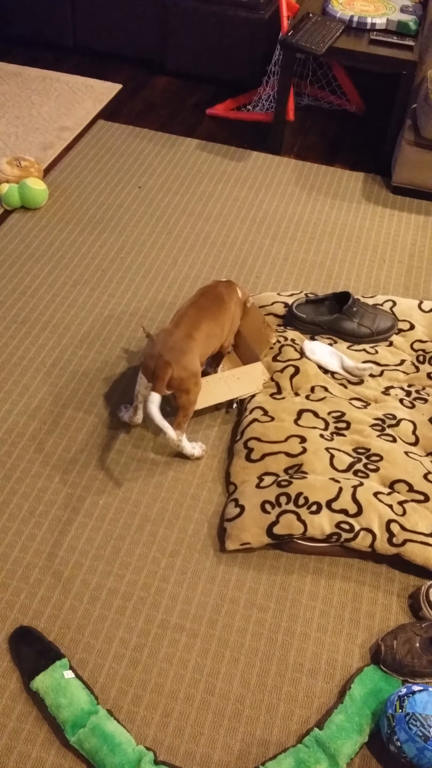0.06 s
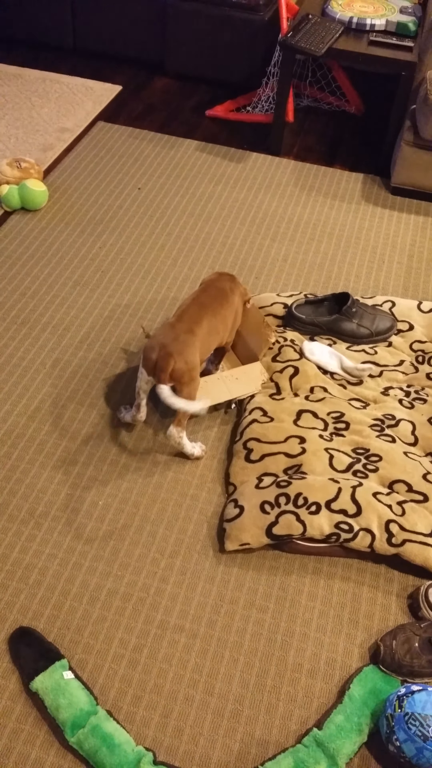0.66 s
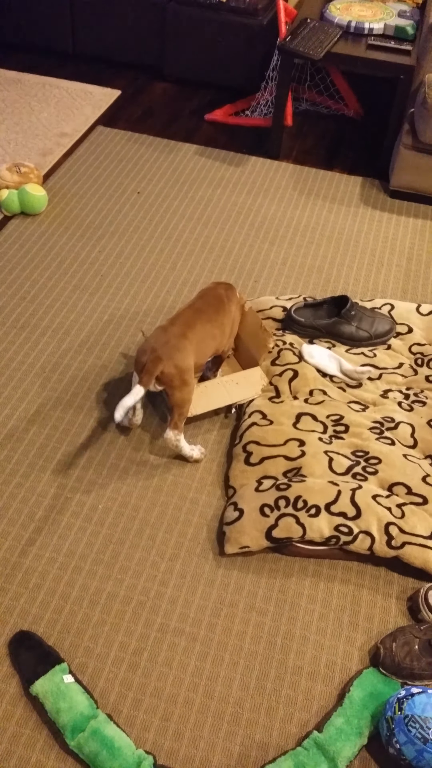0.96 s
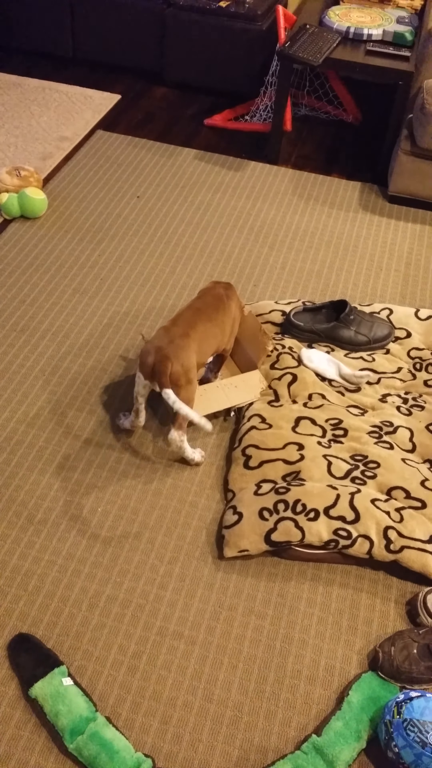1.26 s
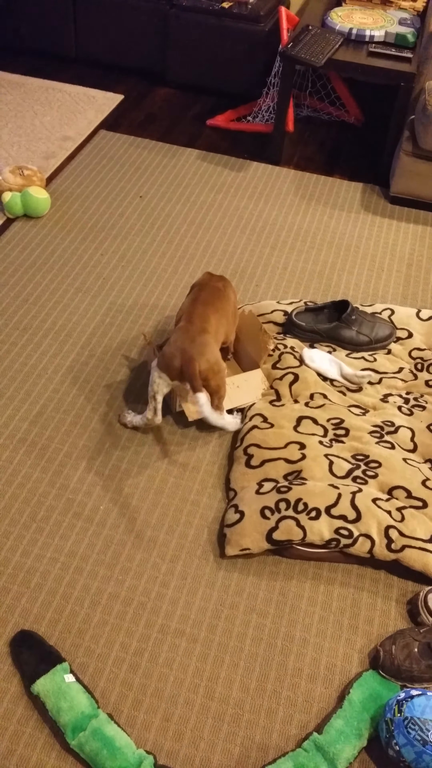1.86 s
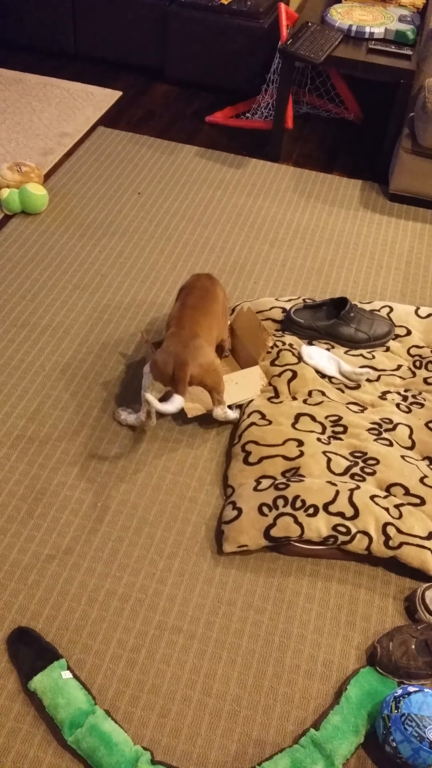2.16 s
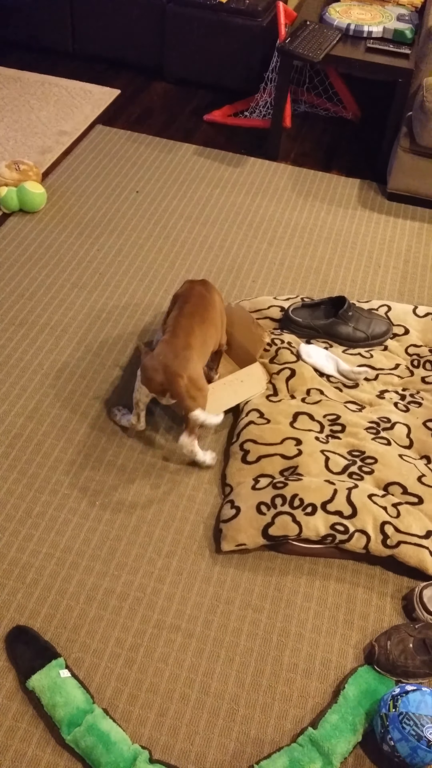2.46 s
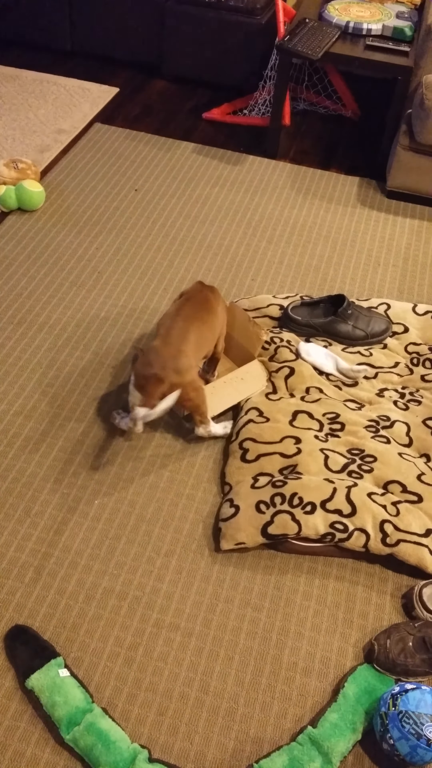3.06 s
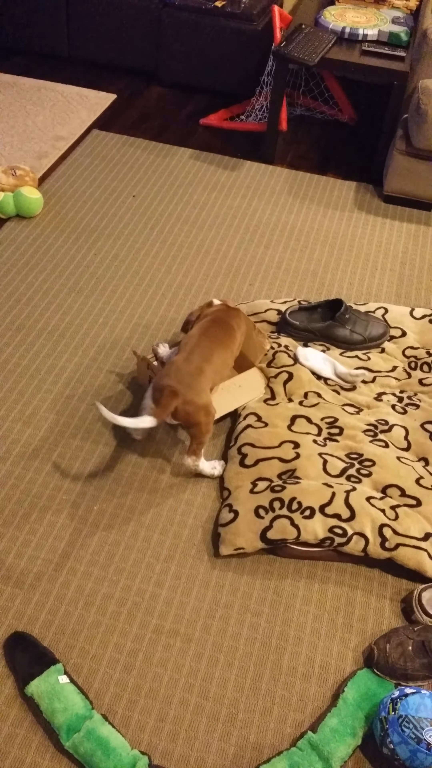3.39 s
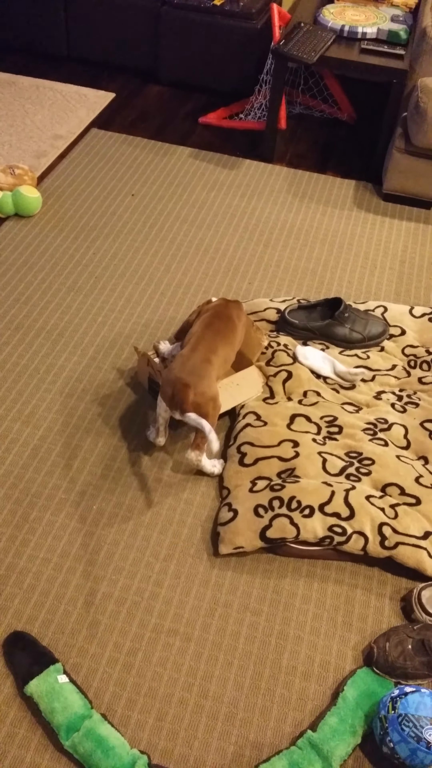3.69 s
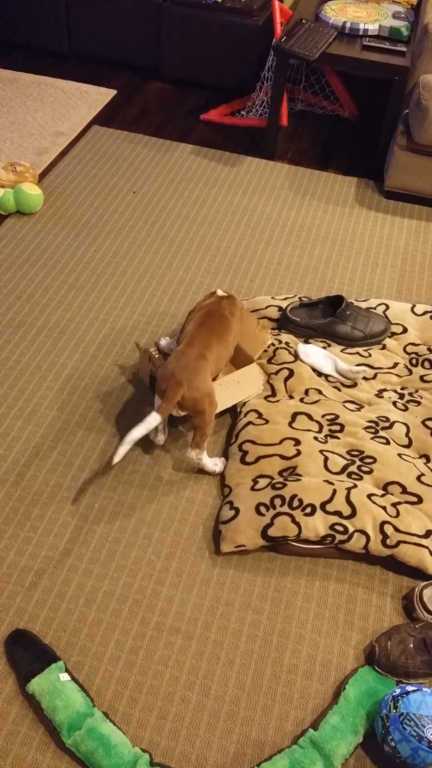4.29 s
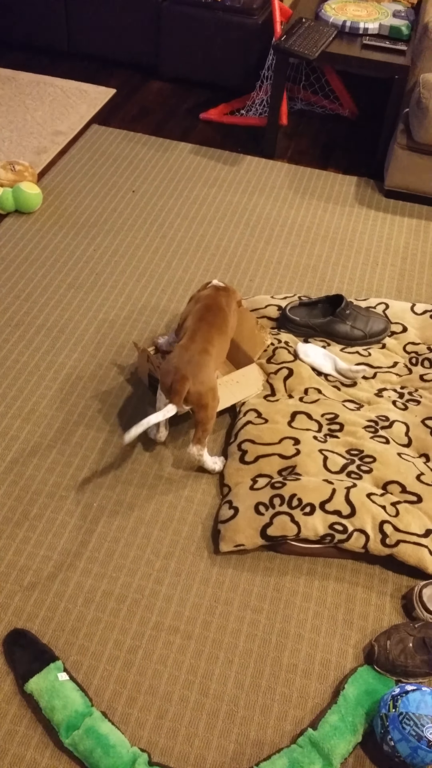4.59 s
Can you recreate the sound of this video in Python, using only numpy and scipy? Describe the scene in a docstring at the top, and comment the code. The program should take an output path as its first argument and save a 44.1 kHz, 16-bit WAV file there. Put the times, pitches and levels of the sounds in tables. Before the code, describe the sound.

Dry cardboard scrapes, crinkles and cracks as a puppy bites a small box and nudges it over a carpeted floor. Sharp snaps and rough slides crowd the first three seconds, mixed with hollow knocks and muffled paw steps. After a brief lull come a few dull bumps and a last run of softer scraping. The microphone is about two metres off in a quiet living room with a short echo.

```python
"""Puppy with a cardboard box

In a quiet living room, a puppy chews a small box and shoves it over the carpet.
The sliding box catches and slips, so its walls drone and its paper skin rasps.
Creases snap under the puppy's teeth, and paws and box bump softly on the floor.
Two microphones, close together, listen from about two metres away."""
import sys
import numpy as np
from scipy import signal
from scipy.fft import rfft, irfft, next_fast_len
from scipy.io import wavfile
from scipy.ndimage import map_coordinates

SR = 44100
rng = np.random.default_rng(int(sys.argv[2]) if len(sys.argv) > 2 else 0)


def master(y):
    """Save y as 16-bit WAV."""
    cut = np.clip(np.atleast_2d(y).T, -1, 1)
    pcm = np.round(cut * 32767)  # scale
    wavfile.write(sys.argv[1], SR, pcm.astype(np.int16))


N = 244314
RING_SIZE = 4096  # samples in one short ring


def amp(db):
    """Turn decibels into a gain."""
    return 10 ** (np.asarray(db) / 20)


def unit(x):
    """Scale a sound to an average power of 1."""
    return x / np.sqrt(np.mean(x ** 2) + 1e-20)


def along(points, hz):
    """Read between (pitch_hz, value) points on a log pitch scale."""
    pitches, values = np.transpose(points)
    return np.interp(np.log(hz + 1), np.log(pitches + 1), values)


def over_time(points):
    """Join (time_s, value) points with straight lines, one value per sample."""
    return np.interp(np.arange(N) / SR, *np.transpose(points))


def wobble(rate):
    """A smooth curve through `rate` random values a second."""
    return map_coordinates(rng.standard_normal(int(N * rate / SR) + 4), [np.arange(N) * rate / SR])


def add(track, start_s, sound):
    """Mix a sound into a track."""
    part = track[max(round(start_s * SR), 0):][:len(sound)]
    part += sound[:len(part)]


def filtered(x, response):
    """Multiply each frequency in x by response(hz)."""
    size = 2 * next_fast_len(N // 2 + SR // 4)
    return irfft(rfft(x, size) * response(np.fft.rfftfreq(size, 1 / SR)), size)[..., :N]


def through(force, ring):
    """Let every sample of a force set off a ring."""
    return signal.oaconvolve(force, ring)[:len(force)]


def ring_of(tone):
    """A short ring, peak 1, with the spectrum given as (pitch_hz, level_db) points."""
    hz = np.fft.rfftfreq(RING_SIZE, 1 / SR)
    cepstrum = irfft(np.log(amp(along(tone, hz))))
    cepstrum[1:len(hz) - 1] *= 2  # folding this in half packs the energy at the ring's start
    cepstrum[len(hz):] = 0
    ring = irfft(np.exp(rfft(cepstrum)))
    return ring / np.abs(ring).max()


def slips(rate, spread_db):
    """Friction: fibres catch and let go about `rate` times a second, most faintly, a few hard."""
    happens = rng.random(N) < rate / SR
    size_db = spread_db * np.minimum(rng.exponential(size=N), 5)
    return unit(happens * amp(size_db) * rng.choice([-1, 1], N))


# How alike the room sounds at the two microphones: pitch_hz, likeness (1 = the same)
MIC_LIKENESS = [(100, 0.68), (350, 0.92), (600, 0.0092), (1000, 0.071), (3000, 0.06)]
def blend_mics(pair):
    """Blend two unrelated sounds so that long waves reach both microphones alike."""
    def weights(hz):
        angle = np.arccos(np.clip(along(MIC_LIKENESS, hz), -1, 1)) / 2
        return np.array([np.cos(angle), np.sin(angle)])
    mid, side = filtered(pair, weights)
    return np.array([mid + side, mid - side])


# The tone of still air: pitch_hz, level_db
AIR_TONE = [(15, -31), (25, -36.5), (49, -7.5), (184, -5), (322, -11), (563, -13.5), (755, -17.5),
            (2080, -23.5), (6190, -29), (6880, -23.5), (7650, -27), (14500, -30)]
# A household hum and a thin electronic whine: pitch_hz, level_db
HUM_AND_WHINE = [(134.6, -86.5), (7085, -88)]
def background(air_db=-69):
    """Still air is a soft noise; a faint hum and whine waver slightly over it."""
    noises = [through(noise, ring_of(AIR_TONE)) for noise in rng.standard_normal((2, N))]
    air = unit(blend_mics(np.array(noises)))
    t = np.arange(N) / SR
    drift = 0.45 * wobble(23)
    hum = sum(amp(db) * np.sqrt(2) * np.sin(2 * np.pi * hz * t + drift) for hz, db in HUM_AND_WHINE)
    return amp(air_db) * air + hum


# How long the room takes to fade by 60 dB: pitch_hz, fade_s
ROOM_FADE = [(100, 0.19), (400, 0.4), (1200, 0.23), (2500, 0.24), (6000, 0.24), (14000, 0.26)]
def reverb(x, build_s=0.0033, patterns=40):
    """The room's wash of echoes, whose pattern keeps changing as the box moves."""
    noise = rng.standard_normal((patterns, 2, SR // 4))
    hz, t, spectra = signal.stft(noise, SR, nperseg=256)
    fade = amp(-60 * t / along(ROOM_FADE, hz)[:, None])
    tails = signal.istft(spectra * fade, SR, nperseg=256)[1]
    tails *= (1 - np.exp(-np.arange(tails.shape[-1]) / SR / build_s)) ** 2
    out = np.zeros((2, N))
    step = N // patterns + 1
    for k, pair in enumerate(tails):
        piece = x[k * step:][:step]
        for mic, tail in zip(out, pair):
            add(mic, k * step / SR, signal.fftconvolve(piece, tail / np.linalg.norm(tail)))
    return blend_mics(out)


# The room's own notes: pitch_hz, level_db
ROOM_NOTES = [(194, 0), (320, -8), (376, 2.5), (450, -6), (606, -7.5), (803, -14.5), (963, -15.5),
              (1236, 6)]
def standing_waves(x, fade_s=0.7):
    """A few pitches linger between the room's walls, the same wherever the box is."""
    t = np.arange(SR // 2) / SR
    fade = amp(-60 * t / fade_s)
    notes = sum(amp(db) * np.cos(2 * np.pi * hz * t) for hz, db in ROOM_NOTES)
    return through(x, notes * fade / fade.sum())


def near_paths(x, echo_db, lag_s, echo_s=0.0048):
    """The direct sound and its echo off a near surface both reach the left microphone first."""
    def response(hz):
        delay = lambda s: np.exp(-2j * np.pi * hz * s)
        right_lag = lag_s * hz ** 2 / (hz ** 2 + 700 ** 2)  # bass arrives in step
        bounce = amp(echo_db) * hz / (hz + 900)  # a small surface reflects little bass
        return np.array([delay(lag) + bounce * delay(echo_s + 2 * lag) for lag in (0, right_lag)])
    return amp(-5) * filtered(x, response)


# The puppy swings round to bite from the other side: time_s, share (of the sound from there)
PUPPY_SWING = [(2.55, 0.49), (2.66, 0.62), (3.2, 0.75), (3.4, 0.11)]
def arriving(x, echo_db):
    """Sound comes partly from the left and partly from almost straight ahead."""
    swung = over_time(PUPPY_SWING)
    from_left = near_paths(x * (1 - swung), echo_db, lag_s=0.0003184)
    from_ahead = near_paths(x * swung, echo_db, lag_s=0.00007)
    return from_left + from_ahead


# The tone of a step on carpet: pitch_hz, level_db
CARPET_TONE = [(20, -65), (45, -18), (65, -26.5), (100, -9), (140, -8), (195, -1.5), (270, -2.5),
               (400, -9.5), (900, -47), (3000, -108)]
# Paws and box landing: start_s, level_db
LANDINGS = [(0.042, -46.5), (0.197, -26.5), (0.366, -32), (0.9, -36.5), (0.922, -33), (1.028, -26),
            (1.16, -30), (1.284, -32), (1.561, -33), (1.604, -33), (2.375, -40), (2.536, -27), (2.817, -40),
            (3.079, -30.5), (3.139, -30), (3.258, -38.5), (3.745, -50.5), (4.335, -37.5), (4.439, -32.5),
            (4.484, -33), (4.852, -46.5), (5.156, -26.5), (5.272, -41)]
def carpet_bumps(drone_db, shuffle_db=-7.5):
    """Carpet muffles landings to thuds; pushing paws shuffle in step with the box's drone."""
    thud = ring_of(CARPET_TONE)
    out = unit(through(slips(rate=300, spread_db=1.5), thud)) * amp(drone_db + shuffle_db)
    for start_s, level_db in LANDINGS:
        add(out, start_s, amp(level_db) * thud)
    return out


# The box's own notes (wider ones die sooner): pitch_hz, width_hz, level_db
BOX_NOTES = [(197, 63, -10.5), (320, 83, -8), (385, 50, -5.5), (449, 60, -6.5), (603.6, 96, -0.5),
             (717, 71, -7.5), (787, 68, -9), (962, 76, -12.5), (1094, 35.5, -6.5), (1210, 108, 0.5),
             (1620, 85, -16), (1850, 170, -15.5), (2240, 80, -14.5), (2430, 110, -26)]
def box_ring(spot_hz, reach_octaves, scatter_db=0, flex_s=0.0018, damping=1, detune=0):
    """A touch rings the box's notes, favouring those near spot_hz, and may damp and detune them."""
    hz, width_hz, level_db = np.transpose(BOX_NOTES)
    t = np.arange(RING_SIZE) / SR
    signs = np.where(np.arange(len(hz)) % 2, -1, 1)
    level_luck, pitch_luck = rng.standard_normal((2, len(hz)))
    nearness = np.exp(-(np.log2(hz / spot_hz) / reach_octaves) ** 2)
    gains = signs * amp(level_db + scatter_db * level_luck) * nearness
    waves = np.sin(2 * np.pi * np.outer(hz * np.exp(detune * pitch_luck), t))
    fades = np.exp(-np.pi * damping * np.outer(width_hz, t))
    ring = gains @ (waves * fades)
    ring *= 1 - np.exp(-t / flex_s)  # soft board takes a moment to start moving
    return ring / np.abs(ring).max()


# The tone of a flat slap on cardboard: pitch_hz, level_db
SLAP_TONE = [(60, -29), (200, -5), (380, -1), (600, -7), (900, -12.5), (1300, -11), (2500, -36),
             (8000, -61)]
# Dull knocks on the box: start_s, level_db, spot_hz (the pitch that spot favours)
BOX_KNOCKS = [(0.044, -41.5, 385), (0.703, -33.5, 790), (0.978, -31, 530), (1.028, -21.5, 566),
              (1.605, -32, 435), (2.047, -37.5, 850), (2.362, -30.5, 890), (3.041, -29.5, 320),
              (3.841, -43, 421), (4.245, -48, 376), (4.336, -38.5, 348), (4.409, -40, 383),
              (4.4402, -23, 330), (4.454, -34, 376), (5.041, -42, 620), (5.074, -38, 555),
              (5.095, -30, 596)]
def knocks():
    """A soft blow slaps the board and briefly rings the hollow box."""
    out = np.zeros(N)
    for start_s, level_db, spot_hz in BOX_KNOCKS:
        ring = box_ring(spot_hz, 0.9, scatter_db=3, flex_s=0.0014, damping=1.02, detune=0.03)
        add(out, start_s, amp(level_db - 3) * (ring + ring_of(SLAP_TONE)))
    return out


# The tone of cracking paper: pitch_hz, level_db
PAPER_TONE = [(30, -70.5), (200, -16), (600, 3.5), (950, 5), (1210, 9), (1380, 0.5), (1520, 3), (1700, 0),
              (1900, 3), (2300, 4.5), (2700, 1.5), (3650, 3), (4000, 0.5), (4400, -0.5), (5000, -1),
              (6600, -1), (9000, -10), (14500, -21)]
def paper_tick(pitch_hz, boost_db, reach_octaves=1):
    """One paper fibre gives way with a tick, boosted around its own pitch."""
    boost = lambda hz: boost_db * np.exp(-(np.log2(hz / pitch_hz) / reach_octaves) ** 2)
    return ring_of([(hz, db + boost(hz)) for hz, db in PAPER_TONE])


def crinkles(rasp_db, above_db=15, spread_db=4.5, centre_hz=3800, count=170):
    """Single fibres tick at random moments, louder as the rasp grows."""
    out = np.zeros(N)
    moments = rng.random(count) * N
    luck = np.clip(rng.standard_normal((count, 2)), -2, 2)
    for sample, (size, pitch) in zip(moments, luck):
        tick = paper_tick(centre_hz * 2 ** (0.7 * pitch), boost_db=9)
        level_db = rasp_db[int(sample)] + above_db + spread_db * size
        add(out, sample / SR, amp(level_db) * tick)
    return out


# Rough strokes of teeth and claws: start_s, level_db, length_s, pitch_hz
STROKES = [(0.695, -37, 0.016, 6900), (0.743, -42.5, 0.032, 6400), (1.299, -42, 0.046, 6900),
           (1.425, -37, 0.05, 6400), (2.166, -39, 0.026, 4960), (2.421, -45, 0.023, 6600),
           (2.684, -35.5, 0.031, 2380), (2.804, -41, 0.014, 1400), (2.868, -31.5, 0.026, 1270),
           (2.937, -30.5, 0.022, 1990), (3.071, -38, 0.025, 6340), (4.613, -60, 0.0095, 3500)]
def scuffs():
    """Each stroke is a dense run of tiny slips that swells and fades."""
    out = np.zeros(N)
    for start_s, level_db, length_s, pitch_hz in STROKES:
        swell = np.sin(np.linspace(0, np.pi, int(length_s * SR)))
        force = slips(rate=1100, spread_db=3)[:len(swell)]
        tick = paper_tick(pitch_hz, boost_db=8, reach_octaves=0.86)
        add(out, start_s, amp(level_db) * swell * unit(through(force, tick)))
    return out


# The light rustle of a box that never quite rests: time_s, level_db
LIGHT_RUSTLE = [(0.0, -65), (0.14, -74), (0.4, -49), (0.67, -68), (0.9, -57.5), (1.45, -51.5), (1.8, -55),
                (2.29, -64.5), (2.7, -50), (3.62, -75.5), (4.07, -85.5), (4.55, -65), (4.75, -72.5),
                (5.2, -60.5), (5.54, -64)]
# Shoves that slide the box: start_s, length_s, build_s, drone_db, rasp_db, hiss_db
BOX_SHOVES = [(0.027, 0.034, 0.022, -60, -65, -69.5), (0.282, 0.05, 0.014, -41, -46, -48),
              (0.424, 0.17, 0.02, -50.5, -52.5, -57), (0.742, 0.045, 0.018, -50.5, -46.5, -50),
              (0.84, 0.039, 0.014, -44, -49.5, -55), (0.888, 0.03, 0.005, -46.5, -67, -62),
              (0.959, 0.055, 0.015, -42.5, -46.5, -49.5), (1.111, 0.13, 0.02, -56, -48.5, -52),
              (1.507, 0.17, 0.019, -46, -47.5, -51), (1.678, 0.074, 0.033, -48, -49, -45),
              (1.874, 0.36, 0.033, -66, -59, -63), (2.038, 0.029, 0.008, -48.5, -46, -53),
              (2.172, 0.062, 0.011, -50.5, -48.5, -50.5), (2.319, 0.08, 0.029, -52, -52, -53),
              (2.413, 0.15, 0.018, -51, -49, -47.5), (2.584, 0.092, 0.008, -61, -50, -54.5),
              (2.836, 0.17, 0.022, -50, -58, -54), (3.087, 0.055, 0.036, -40, -47, -42),
              (3.209, 0.12, 0.011, -58, -58, -59), (3.381, 0.13, 0.05, -62.5, -60, -57),
              (3.717, 0.19, 0.099, -61.5, -67, -68), (4.227, 0.056, 0.013, -64, -72.5, -70.5),
              (4.319, 0.22, 0.009, -57, -68.5, -66.5), (4.605, 0.036, 0.012, -61, -80, -64),
              (4.753, 0.13, 0.034, -57.5, -64, -72), (4.815, 0.052, 0.019, -48.5, -54.5, -56.5),
              (5.036, 0.088, 0.014, -55.5, -58.5, -58.5), (5.136, 0.28, 0.06, -60.5, -54.5, -55.5),
              (5.266, 0.11, 0.034, -50.5, -51.5, -52.5)]
def shove_levels(let_go_s=0.0074):
    """Drone, rasp and hiss levels in dB: each shove builds, holds and lets go, over the rustle."""
    t = np.arange(N) / SR
    rustle_mix = amp([-3, 0, -0.5])  # drone, rasp, hiss
    power = np.outer(rustle_mix, amp(over_time(LIGHT_RUSTLE))) ** 2
    for start_s, length_s, build_s, *levels_db in BOX_SHOVES:
        rise = np.clip((t - start_s) / build_s, 0, 1)
        fall = np.exp(-np.clip((t - start_s - length_s) / let_go_s, 0, 20))
        power += np.outer(amp(levels_db), rise * fall) ** 2
    return 10 * np.log10(power)


# Places where the box rubs: spot_hz, level_db
RUBBING_SPOTS = [(380, -2.5), (620, 2.5), (1150, -8)]
def wall_drone(drone_db, shift_db=3, firm_db=-47):
    """Friction keeps the box's walls ringing while the contact shifts from spot to spot."""
    db_per_octave = 0.0201 * (drone_db - firm_db)  # a lighter touch sounds a little deeper
    shares = np.array([amp(db + shift_db * wobble(8.3) + db_per_octave * np.log2(hz / 680))
                       for hz, db in RUBBING_SPOTS])
    voices = np.array([unit(through(slips(rate=900, spread_db=4.5), box_ring(hz, reach_octaves=0.72)))
                       for hz, _ in RUBBING_SPOTS])
    return (shares * voices).sum(axis=0) / np.linalg.norm(shares, axis=0) * amp(drone_db)


# The tone of paper dragged over carpet: pitch_hz, level_db
RASP_TONE = [(300, -41), (800, 7.5), (1300, 6), (1700, 2.5), (2200, 3), (2900, -0.5), (3200, -0.5),
             (3550, 5), (3950, 2.5), (5600, -1.5), (6800, -1.5), (8500, -8), (11000, -8.5), (14500, -12.5)]
def sliding(drone_db, rasp_db, hiss_db, split_hz=4700):
    """The box judders along: its walls drone, its paper rasps and, higher up, the carpet hisses."""
    judder = wobble(45)
    drone = wall_drone(drone_db) * amp(2 * judder)
    ring = ring_of(RASP_TONE)
    lows = lambda hz: 1 / (1 + (hz / split_hz) ** 6)
    rasp = filtered(through(slips(rate=2200, spread_db=3.5), ring), lows)
    hiss = filtered(through(slips(rate=3800, spread_db=3), ring), lambda hz: 1 - lows(hz))
    return drone + (unit(rasp) * amp(rasp_db) + unit(hiss) * amp(hiss_db)) * amp(1.19 * judder)


def tearing(crumble_s, evenness=0.75):
    """A crease breaks and more fibres follow at once, in one very short burst."""
    t = np.arange(RING_SIZE) / SR
    fibres = 0.46 * rng.standard_normal(len(t)) * (rng.random(len(t)) < 0.3) * np.exp(-t / crumble_s)
    fibres[0] = 1  # the first break
    spectrum = rfft(fibres)
    flattened = irfft(spectrum / np.abs(spectrum) ** evenness)
    burst = flattened * np.exp(-t / (10 * crumble_s))
    return burst * np.linalg.norm(fibres) / np.linalg.norm(burst)


# Creases giving way: start_s, crack_db, wall_db, brightness_db_per_octave, spot_hz, crumble_s
CREASES = [(0.1972, -19, -23, 2, 480, 0.0036), (0.3240, -7.5, -22, 3.5, 840, 0.00087),
           (0.3668, -12, -22.5, 6, 490, 0.0018), (0.5235, -21, -32, 2.5, 710, 0.0042),
           (0.5966, -25.5, -26.5, 4.5, 800, 0.0048), (0.862, -21.5, -35, 1.5, 556, 0.0022),
           (0.9825, -23.5, -26, 1, 560, 0.0039), (1.1619, -18, -27.5, -0.5, 510, 0.0047),
           (1.2827, 1.5, -15.5, 0, 560, 0.0022), (1.2988, -28, -37, 9, 800, 0.002),
           (1.329, -22, -40, -2, 800, 0.003), (1.3572, -15.5, -37, -1.5, 800, 0.0019),
           (1.365, -17.5, -38, 0.5, 800, 0.0027), (1.5636, -26, -37, -1.5, 400, 0.0031),
           (2.3625, -34, -35, -9.5, 900, 0.0023), (2.5385, -15.5, -33, -4, 700, 0.0034),
           (2.5537, -23, -46, -2, 900, 0.0017), (2.6968, -16, -31.5, -2.5, 700, 0.002),
           (2.7048, -18.5, -35, -3, 900, 0.0017), (2.7105, -25, -50, -2, 900, 0.002),
           (2.8163, -9.5, -24.5, -0.5, 330, 0.0019), (2.9188, -13, -54, 0.5, 800, 0.0012),
           (2.9395, -12, -42, -1.5, 800, 0.0011), (3, -34, -37, -6, 300, 0.0028),
           (3.0372, -25, -36, -1.5, 320, 0.0043), (3.078, -23, -29.5, 4.5, 400, 0.0035),
           (3.143, -14, -25, 0.5, 397, 0.0023), (3.3928, -39, -39.5, -3, 597, 0.0022),
           (3.8393, -42, -41.5, -4, 420, 0.004), (4.3352, -37.5, -41, -6, 378, 0.0029),
           (4.4378, -27.5, -52, -8, 380, 0.0021), (4.484, -29, -39, -3, 380, 0.0038),
           (4.612, -35, -50, 2.5, 1010, 0.0059), (5.095, -33, -46, -1, 590, 0.002),
           (5.2695, -35, -37, 0, 1100, 0.0013)]
def crease_snaps(start_delay_s=0.0008):  # each snap sounds this long after its listed start
    """Each bitten crease cracks through the paper and kicks the walls of the box."""
    out = np.zeros(N)
    for start_s, crack_db, wall_db, brightness, spot_hz, crumble_s in CREASES:
        paper = ring_of([(hz, db + brightness * np.log2(max(hz, 700))) for hz, db in PAPER_TONE])
        kick = box_ring(spot_hz, 1.73, scatter_db=2.5, flex_s=0.00052, damping=1.39, detune=0.025)
        crack = through(tearing(crumble_s), paper)
        add(out, start_s + start_delay_s, amp(crack_db - 3.5) * crack + amp(wall_db) * kick)
    return out


def scene():
    """Rubbing, cracks and blows reach the microphones directly and by way of the room."""
    drone_db, rasp_db, hiss_db = shove_levels()
    rubbing = sliding(drone_db, rasp_db, hiss_db) + scuffs()
    cracks = crease_snaps() + crinkles(rasp_db)
    blows = knocks() + carpet_bumps(drone_db)
    near = arriving(rubbing + blows, echo_db=-11)
    near += arriving(cracks, echo_db=-2.5)  # a crack comes from one spot, so its echo is clearest
    room = reverb(amp(-3) * rubbing + amp(-6) * cracks + amp(-5.5) * blows)
    room += standing_waves(rubbing + cracks + blows)
    return near + room + background()


# How much louder the left microphone is than the right: pitch_hz, difference_db
MIC_BALANCE = [(200, 0), (380, -3.5), (700, -5), (1200, -1.5), (2400, 0), (4300, -2), (5400, 5.5),
               (6500, 6), (8200, -5), (10000, 0.5), (15000, 1.5)]
def record(dry, low_cut_hz=45, top_hz=14750):
    """Each microphone has its own tone; both lose the deepest bass and the highest treble."""
    def response(hz):
        balance = amp(np.outer([0.5, -0.5], along(MIC_BALANCE, hz)))
        s = 1j * hz / low_cut_hz
        low_cut = s ** 2 / (s ** 2 + s + 1)
        return balance * low_cut * (hz < top_hz)
    return filtered(dry, response)


dry = scene()
out = record(dry)
master(out)
```